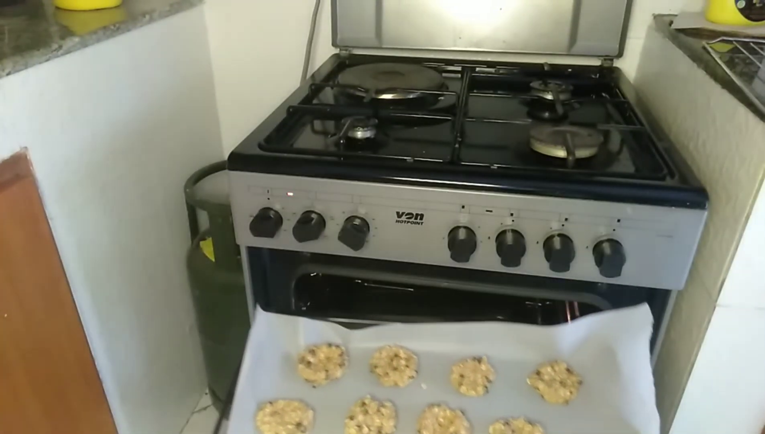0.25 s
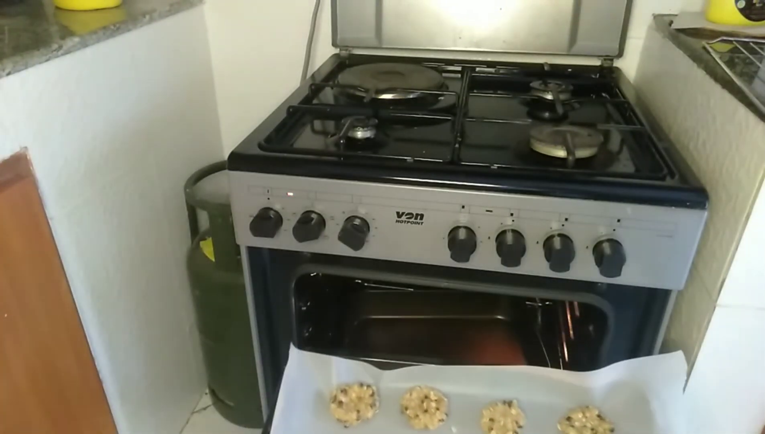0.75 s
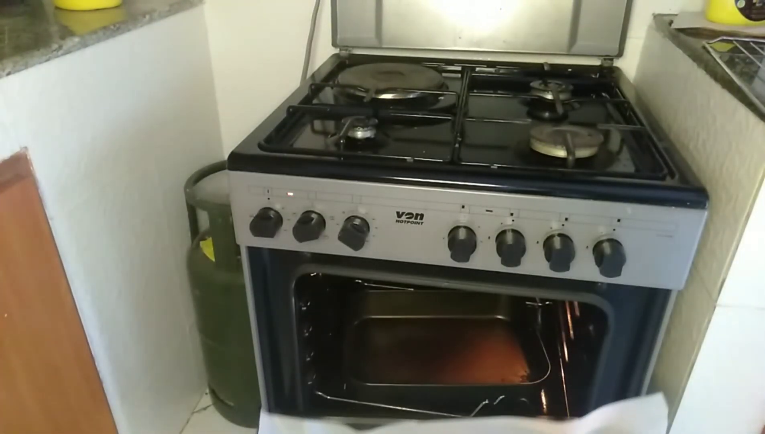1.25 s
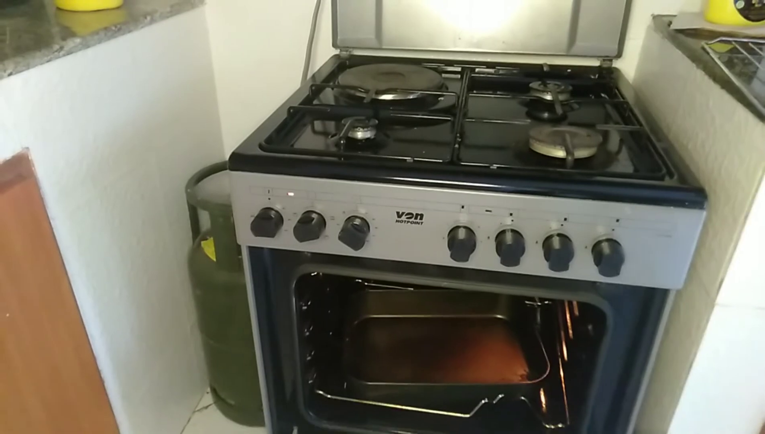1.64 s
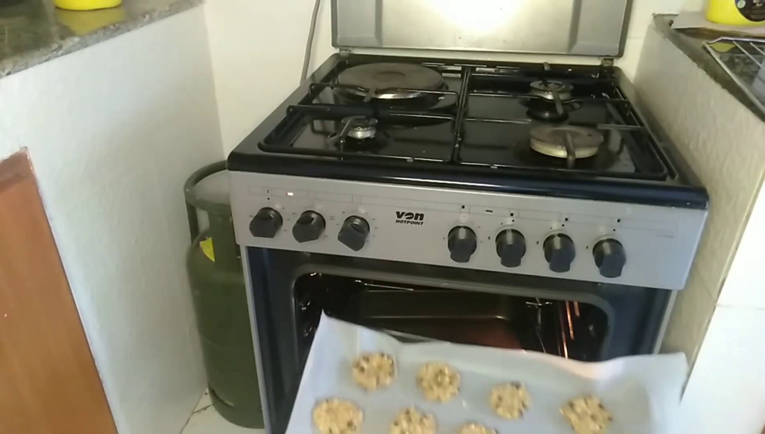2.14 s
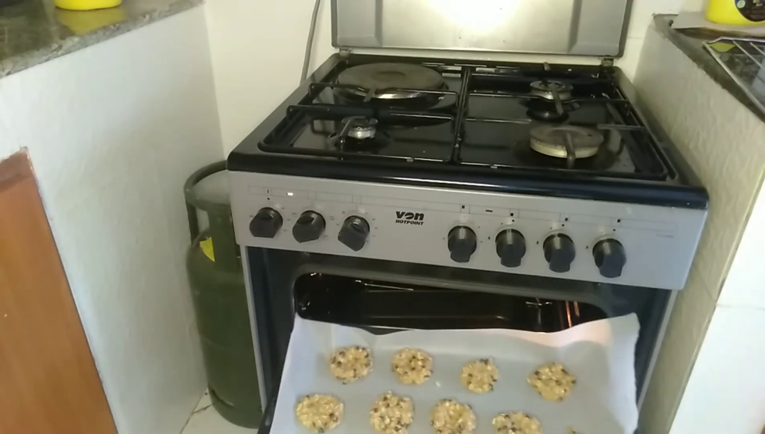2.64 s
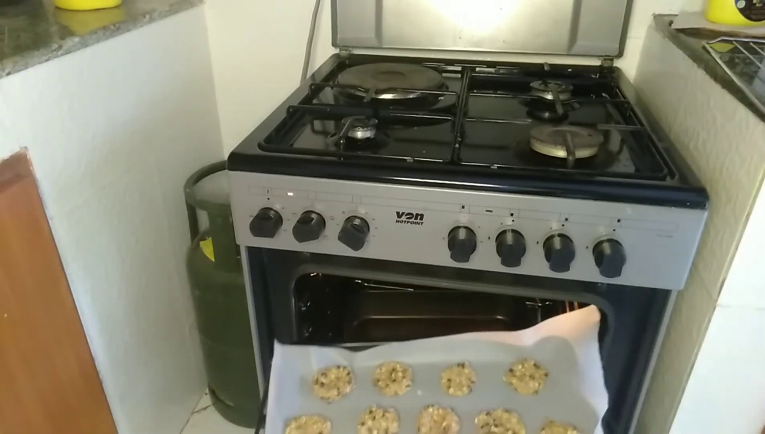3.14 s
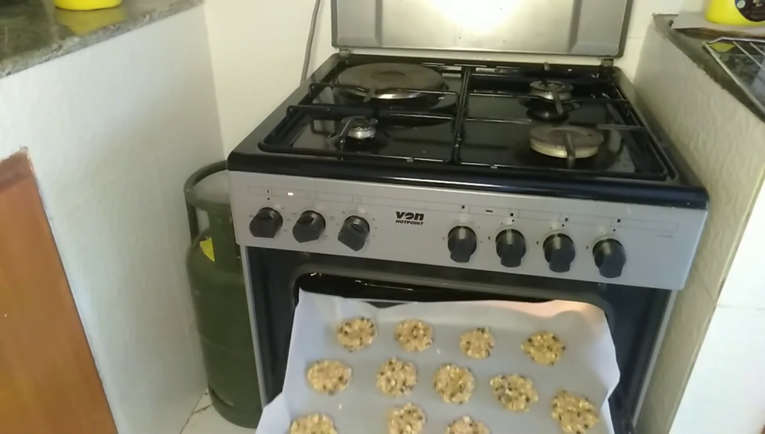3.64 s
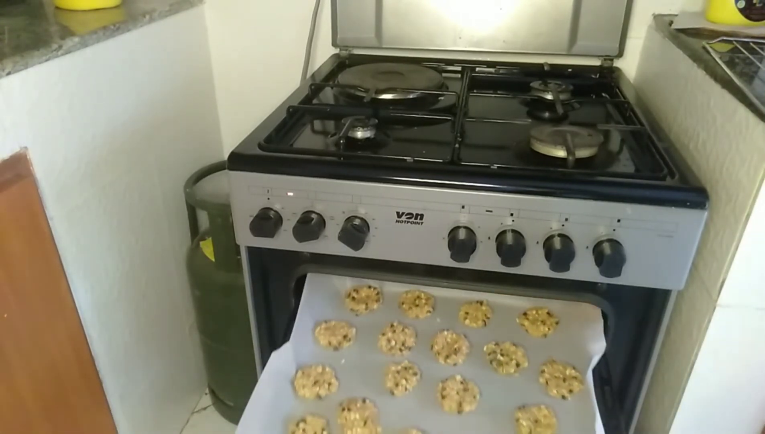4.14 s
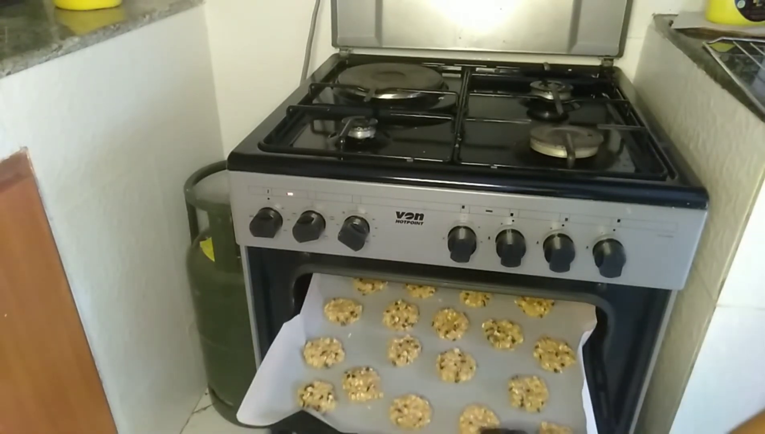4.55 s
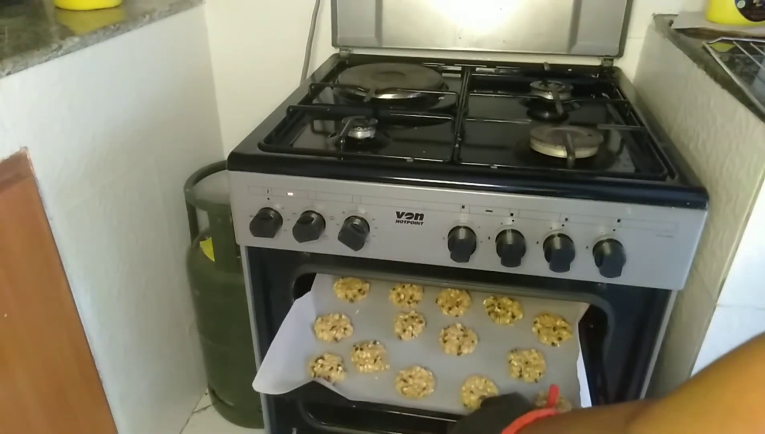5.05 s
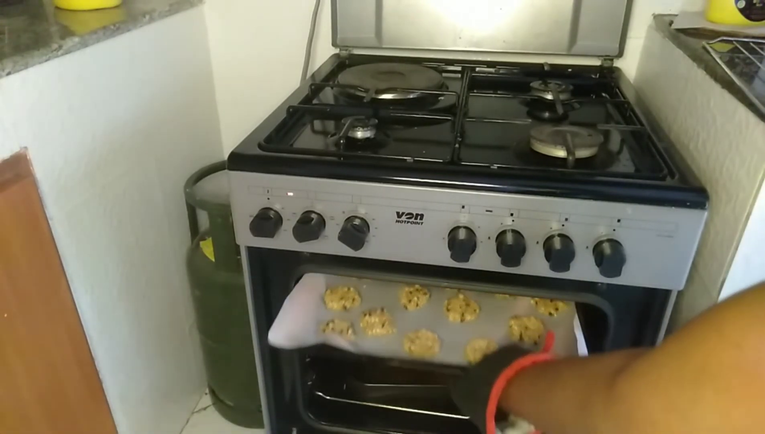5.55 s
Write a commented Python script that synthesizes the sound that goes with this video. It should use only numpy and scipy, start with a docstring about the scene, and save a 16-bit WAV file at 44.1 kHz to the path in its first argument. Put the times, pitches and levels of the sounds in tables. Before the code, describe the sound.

An oven door clanks open and bounces, then a metal baking tray bangs down, scrapes inward over rails and booms against the oven back.

```python
"""A small hard-walled kitchen, one microphone: an oven door drops onto its hinge stops and bounces,
a sheet-metal baking tray clanks down on it, bumps and scrapes in along the rails and strikes the back.
Each blow is a low thump plus decaying steel modes over a clatter of noise; scrape and paper are swelling
coloured noise. Far off outside, an engine hums as a few harmonics and small birds chirp as falling
tones. A faint tone fades away in the steady noise of the room."""
import sys
import numpy as np
from scipy import signal
from scipy.fft import rfft, irfft, next_fast_len
from scipy.io import wavfile
from scipy.ndimage import map_coordinates

SR = 44100
rng = np.random.default_rng(int(sys.argv[2]) if len(sys.argv) > 2 else 0)


def pcm_store(signal):
    """Save signal as 16-bit PCM."""
    levels = np.round(np.clip(np.atleast_2d(signal), -1, 1) * 32767)
    wavfile.write(sys.argv[1], SR, levels.astype(np.int16).T)


N = 255339  # samples in the scene


def amp(db):
    """Decibels to gain."""
    return 10 ** (np.asarray(db) / 20)


def rms(x):
    """Root mean square."""
    return np.sqrt(np.mean(x ** 2) + 1e-24)


def along(points, hz):
    """Read (f/Hz, value) points on a log frequency axis."""
    f, value = np.transpose(points)
    return np.interp(np.log(hz + 1), np.log(f + 1), value)


def curves(rows):
    """One value per sample for each column after t/s."""
    s, *columns = np.transpose(rows)
    return [np.interp(np.arange(N) / SR, s, column) for column in columns]


def wobble(rate, size=N):
    """A smooth random curve with rate knots a second."""
    knots = rng.standard_normal(int(size * rate / SR) + 4)
    # spline between the knots in tenths, then straight lines between the tenths
    smooth = map_coordinates(knots, [np.arange(10 * len(knots) - 10) / 10])
    return np.interp(np.arange(size) * 10 * rate / SR, np.arange(len(smooth)), smooth)


def filtered(x, response):
    """Shape the spectrum of x by a response of frequency."""
    padded = next_fast_len(len(x) + SR // 4)
    hz = np.fft.rfftfreq(padded, 1 / SR)
    return irfft(rfft(x, padded) * response(hz), padded)[:len(x)]


def noise(spectrum, size=N):
    """Noise coloured by (f/Hz, level/dB) points, brought to rms 1."""
    x = filtered(rng.standard_normal(size), lambda hz: amp(along(spectrum, hz)))
    return x / rms(x)


def add(track, s, x):
    """Mix x into the track at s seconds."""
    start = max(round(s * SR), 0)
    part = track[start:start + len(x)]
    part += x[:len(part)]


def arches(rows, fullness):
    """Gain of swells that rise from rest and sink back; a small fullness exponent flattens their tops."""
    t = np.arange(N) / SR
    power = np.zeros(N)
    for s, length, db in rows:
        progress = np.clip((t - s) / length, 0, 1)
        power += (amp(db) * np.abs(np.sin(np.pi * progress)) ** fullness) ** 2
    return np.sqrt(power)


# the kitchen's background colour: f/Hz, level/dB per Hz
ROOM_COLOUR = [(12, -40), (20, 1.5), (49, 1), (70, -8), (96, -13.5), (138, -8.5), (301, -18.5),
               (624, -13.5), (849, -16.5), (1000, -16), (2670, -30.5), (7110, -33), (9670, -35.5),
               (14700, -34), (16000, -32)]


def room():
    """The kitchen's quiet, nearly steady background noise."""
    drift_db = 0.6 * wobble(3)
    return amp(-61.5 + drift_db) * noise(ROOM_COLOUR)


def whine():
    """A faint background tone, fuzzy in level and phase, that fades away."""
    tone_hz, start_db, fade_db_per_s = 620, -70.5, 3.5
    t = np.arange(N) / SR
    tone = amp(2 * wobble(12)) * np.sin(2 * np.pi * tone_hz * t + 1.2 * wobble(25))
    return amp(start_db - fade_db_per_s * t) * np.sqrt(2) * tone


# the far engine slowly gathers speed: t/s, firing f/Hz
ENGINE_SPEED = [(.5, 122), (1.2, 126.4), (2.0, 130), (3.2, 130.8)]
# its note comes and goes in swells: start t/s, length t/s, peak level/dB
ENGINE_SWELLS = [(-.1, .5, -67), (.27, .68, -56.5), (.85, .89, -51.5), (1.72, .83, -54), (2.71, .24, -63.5),
                 (3.06, .36, -63)]
# its rumble: t/s, level/dB
RUMBLE_LEVEL = [(0, -69.5), (.4, -60.5), (3, -64), (4, -64), (5.7, -63)]


def engine():
    """A far engine: a swelling firing note, weak overtones and an unsteady rumble about an octave below."""
    firing_hz, = curves(ENGINE_SPEED)
    rumble_db, = curves(RUMBLE_LEVEL)
    phase = 2 * np.pi * np.cumsum(firing_hz) / SR
    firing = np.sin(phase) + amp(-21) * np.sin(2 * phase) + amp(-27) * np.sin(3 * phase)
    note = arches(ENGINE_SWELLS, fullness=0.8) * np.sqrt(2) * firing
    rumble = noise([(35, -44), (50, 1), (57, 1.0), (64, -19), (85, -35), (300, -120)])
    return note + amp(rumble_db) * rumble


# how long sound rings on: f/Hz, time to fall 60 dB t/s (for modes, before the body's sustain factor)
RING_ON = [(80, 1), (200, 1), (380, 0.74), (600, 0.81), (1000, 0.6), (2500, 0.49), (6000, 0.47),
           (15000, 0.42)]


def dying(x):
    """Each frequency of x dies away at its own speed."""
    hz, t, z = signal.stft(x, SR, nperseg=256)
    fade = amp(-60 * t / along(RING_ON, hz)[:, None])
    return signal.istft(z * fade, SR, nperseg=256)[1][:len(x)]


# the chirps: start t/s, length t/s, middle f/Hz, relative level/dB
CHIRPS = [(0.0, 0.12, 4820, -76.5), (0.085, .12, 3810, -77.5), (0.2, .17, 7470, -73.5),
          (0.27, 0.14, 3800, -75.5), (1.308, 0.14, 4650, -73), (1.88, 0.056, 5190, -77),
          (1.945, 0.054, 3370, -77), (2.109, 0.047, 5420, -69), (2.141, 0.15, 4830, -74),
          (2.3, .11, 3830, -78), (2.586, 0.03, 6320, -77), (2.67, .03, 4800, -77), (4.496, 0.13, 4850, -73)]


def birds():
    """Small birds outside: gliding tones with a buzzing pitch, blurred by the walls."""
    fall_octaves = 0.14
    song = np.zeros(N)
    for s, length, pitch_hz, db in CHIRPS:
        count = int(length * SR)
        buzz = 0.085 * wobble(500, size=count)
        glide = 2 ** (fall_octaves * np.linspace(0.5, -0.5, count))
        hz = pitch_hz * glide * (1 + buzz)
        tone = np.sin(2 * np.pi * np.cumsum(hz) / SR)
        add(song, s, amp(db) * 2 * np.hanning(count) * tone)
    echo = dying(rng.standard_normal(SR // 2))
    return signal.fftconvolve(song, echo / np.linalg.norm(echo))[:N]


# the baking paper's colour: f/Hz, level/dB per Hz
PAPER_COLOUR = [(2000, -10.5), (3200, -6.5), (5000, -12.5), (7000, -1), (9500, -13.5), (12000, -13.5),
                (15000, -4.5), (16000, 0)]
# single creases snap as the tray is carried: t/s, level at the onset/dB
CREASES = [(0.018, -62.5), (1.895, -67), (2.37, -65), (2.6, -72)]


def creases():
    """Faint snaps of the paper: bursts of its noise, dying away in the room."""
    t60_s = 0.33
    track, t = np.zeros(N), np.arange(SR // 4) / SR
    for s, db in CREASES:
        add(track, s, amp(db - 60 * t / t60_s) * noise(PAPER_COLOUR, size=len(t)))
    return track


def ringing(modes, t, sustain, waver):
    """Decaying modes at fresh strengths; loose contact makes their phase waver."""
    hz, db = np.transpose(modes)[:, :, None]
    drift = wobble(30, size=len(modes) * len(t)).reshape(len(modes), -1)
    phase = 2 * np.pi * (hz * t + rng.random(hz.shape)) + waver * drift
    fade_db = 60 * t / (sustain * along(RING_ON, hz))
    strength_db = db + rng.normal(0, 0.98, hz.shape)
    return np.sum(amp(strength_db - fade_db) * np.sin(phase), axis=0)


# edges of the thump, knock, clang, clink and tick bands: f/Hz
BAND_EDGES = [60, 220, 700, 2500, 9000, 16000]


def struck(blows, modes, colour, balance_db, modes_db, sustain, direct_db, direct_s,
           crack_db, chatter_db, waver):
    """Blows on a steel body: a low thump, and clear modes over a dense clatter with its own brightness."""
    pivot_hz = 1340  # brightness tilts the upper bands about this frequency
    track, t = np.zeros(N), np.arange(SR * 3 // 4) / SR
    head = slice(SR // 25)  # levels hold over the first 40 ms
    below = lambda hz, edge: 1 / (1 + (hz / edge) ** 10)
    centres_hz = np.sqrt(np.multiply(BAND_EDGES[1:-1], BAND_EDGES[2:]))
    octaves = np.log2(centres_hz / pivot_hz)
    for s, contact, thump_db, clang_db, brightness in blows:
        upper_db = clang_db + np.array(balance_db) + brightness * octaves
        levels_db = [thump_db, *upper_db]
        # loose parts chatter just after the blow, then melt into the room's answer
        chatter = amp(chatter_db * wobble(725, size=len(t)) * np.exp(-t / 0.013))
        clatter = chatter * dying(noise(colour, size=len(t)))
        ring = ringing(modes, t, sustain, waver)
        body = clatter / rms(clatter[head]) + amp(modes_db) * ring / rms(ring[head])
        # a longer contact rises more slowly
        onset = 1 - np.exp(-(2 * t / contact) ** 2)
        # the direct sound stands above the room for the first moments
        shape = onset * (1 + amp(direct_db) * np.exp(-t / direct_s))
        for lo, hi, db in zip(BAND_EDGES, BAND_EDGES[1:], levels_db):
            # an early crack, stronger in the treble, which leaves the steel first
            crack = 1 + amp(crack_db) * np.sqrt(lo / BAND_EDGES[-1]) * np.exp(-t / 0.0068)
            band = filtered(body, lambda hz: below(hz, hi) - below(hz, lo))
            part = crack * shape * band
            add(track, s, amp(db) * part / rms(part[head]))
    return track


# the door's blows: t/s, contact t/s, thump level/dB, clang level/dB before balance and brightness,
# brightness/dB per octave
DOOR_BLOWS = [(.488, .0018, -72, -74, 0.5), (.683, 0.0015, -57, -53, -2), (.7505, 0.0014, -43.5, -35, 0.5),
              (.881, .0009, -53.5, -48.5, -1.5), (.905, 0.0011, -50, -40, -0.65),
              (.946, 0.0044, -54, -53, -1.5), (1.04, .0017, -65, -64.5, 2), (1.149, 0.0014, -71, -59, -2.5),
              (1.26, 0.0047, -63, -71, -1.5), (1.3, 0.044, -77, -66, -1.5),
              (1.485, 0.017, -75, -64.5, -1.5)]
# the door's strongest modes: f/Hz, mean relative level/dB
DOOR_MODES = [(347, -8), (378, -1), (399, 0), (596, -9), (625, -8), (987, -11), (1005, -12), (1456, -12),
              (1617, -12), (1733, -15), (2027, -16), (2412, -16), (3209, -17), (3262, -14), (3306, -18),
              (4480, -21), (6696, -17), (6815, -20), (6940, -18), (6968, -20), (7014, -21), (7036, -20),
              (7127, -20), (7317, -21), (7368, -22), (7474, -22)]
# the crowd of its weaker modes: f/Hz, level/dB per Hz
DOOR_COLOUR = [(35, -36), (60, -0.5), (87, -19.5), (212, -6.5), (274, -14), (389, -6), (480, -14),
               (607, -11), (842, -14.5), (968, -10), (3500, -22), (4860, -30.5), (7060, -24), (9350, -33.5),
               (16000, -24)]
# its share of a blow in the knock, clang, clink and tick bands: level/dB each
DOOR_BALANCE_DB = [0.5, -1, -4, -15.5]


def door():
    """The oven door lands on its hinge stops, bounces and settles."""
    return struck(DOOR_BLOWS, DOOR_MODES, DOOR_COLOUR, DOOR_BALANCE_DB, modes_db=-2, sustain=0.49,
                  direct_db=3.5, direct_s=0.073, crack_db=4, chatter_db=1.5, waver=0.36)


# pushes sliding the tray over the door, then along the rails: start t/s, length t/s, relative level/dB
PUSHES = [(3.45, 0.63, -71), (4.27, 0.28, -58.5), (4.8, 0.97, -73), (5.33, 0.63, -59)]
# the scraping steel's colour: f/Hz, level/dB per Hz
SCRAPE_COLOUR = [(88, -42), (150, -3), (473, -3.5), (515, -2.5), (1280, 0), (1520, -7), (2490, -11.5),
                 (4770, -24), (7080, -29), (9000, -45), (11700, -58), (19800, -120)]
# the paper drags as the tray moves: start t/s, length t/s, relative level/dB
RUSTLES = [(2.65, 0.33, -72), (3.3, 0.51, -63.5), (3.72, 0.44, -61), (4.17, 0.52, -67.5), (4.7, 1, -64.5),
           (5.3, 1, -60.5)]


def sliding():
    """As the tray moves its paper hisses, and with each push steel scrapes grainily and the sheet sings."""
    grit = amp(0.82 * wobble(300)) * noise(SCRAPE_COLOUR)
    # the grit sings in the many close modes of the thin sheet
    t = np.arange(SR // 4) / SR
    sheet = rng.standard_normal(len(t)) * amp(-60 * t / 0.22)
    singing = signal.fftconvolve(grit, sheet / np.linalg.norm(sheet))[:N]
    scrape = arches(PUSHES, fullness=0.59) * amp(0.96 * wobble(35)) * (grit + singing)
    rustle = amp(1.38 * wobble(22) + 1.3 * wobble(700)) * noise(PAPER_COLOUR)
    return scrape + arches(RUSTLES, fullness=0.37) * rustle


# the tray on the open door: t/s, contact t/s, thump level/dB, clang level/dB before balance and
# brightness, brightness/dB per octave
TRAY_BLOWS = [(2.845, .0022, -80, -74.5, 3.5), (2.95, .0009, -80, -65.5, 1.2), (3.204, .003, -87, -71, 2.5),
              (3.217, 0.00092, -80, -60, 4), (3.274, 0.00061, -79, -71.5, 5.5),
              (3.3135, 0.0022, -42.5, -32.5, -4), (3.667, 0.0027, -61.5, -74, 3)]
# the tray's strongest modes: f/Hz, mean relative level/dB
TRAY_MODES = [(184, -8), (293, -4), (312, -2), (347, -1), (382, 0), (404, -5), (533, -9), (560, -6),
              (633, -11), (777, -11), (868, -9), (884, -11), (914, -8), (958, -11), (1139, -10),
              (1188, -12), (1315, -14), (1444, -12), (1721, -14), (1743, -15), (1768, -10), (1797, -14),
              (2574, -22), (6777, -26), (6897, -24), (6922, -25), (6992, -26), (7062, -25), (7167, -26),
              (7490, -22)]
# the crowd of its weaker modes: f/Hz, level/dB per Hz
TRAY_COLOUR = [(35, -45), (70, -5.5), (110, -16), (230, -7.5), (350, -6), (480, -6.5), (570, -9),
               (710, -14), (920, -13), (1750, -18), (2000, -19.5), (4600, -35.5), (7300, -29), (9800, -39),
               (15500, -25.5)]
# its share of a blow in the knock, clang, clink and tick bands: level/dB each
TRAY_BALANCE_DB = [-3, 0.5, -1, -10]


def tray():
    """The sheet-metal tray touches, then drops on the open door."""
    return struck(TRAY_BLOWS, TRAY_MODES, TRAY_COLOUR, TRAY_BALANCE_DB, modes_db=1.5, sustain=0.76,
                  direct_db=-1.0, direct_s=0.025, crack_db=2, chatter_db=2.0, waver=0.28)


# the tray on the rails: t/s, contact t/s, thump level/dB, clang level/dB before balance and
# brightness, brightness/dB per octave
RAIL_BLOWS = [(4.204, 0.0051, -47, -53.5, -2.2), (4.257, .0024, -44.5, -48, 2.8),
              (4.288, 0.0021, -52, -56, -5), (4.338, 0.0047, -63, -56, -3), (4.4, 0.0086, -63, -59, -2.5),
              (4.718, 0.0067, -65.5, -60, 0), (4.845, 0.01, -69, -56, 0),
              (4.885, 0.0027, -54.5, -56.5, -0.5), (5.124, 0.0018, -56, -64, -2.5),
              (5.168, 0.017, -70, -64, 2.5), (5.25, .0022, -72, -64.5, -1), (5.335, 0.0045, -58, -56, -.6),
              (5.411, 0.0043, -65.5, -63, 2), (5.495, .0069, -68, -61, 2.5),
              (5.653, .0052, -56.5, -54.5, 3)]
# the oven box's strongest modes: f/Hz, mean relative level/dB
OVEN_MODES = [(127, 0), (151, -3), (186, -4), (238, -9), (297, -9), (419, -11), (529, -5), (559, -12),
              (591, -14), (649, -10), (825, -15), (1060, -13), (2176, -19), (2319, -20), (6570, -26),
              (6728, -25), (6753, -24), (6784, -24), (6925, -26), (7175, -26)]
# the crowd of its weaker modes: f/Hz, level/dB per Hz
OVEN_COLOUR = [(35, -39), (60, -10), (118, 1), (301, -16.5), (354, -15.5), (540, -18.5), (732, -16),
               (1060, -13), (1440, -15.5), (2250, -19.5), (4860, -36.5), (6740, -31.5), (9130, -37.5),
               (14900, -29), (16000, -43)]
# its share of a blow in the knock, clang, clink and tick bands: level/dB each
RAIL_BALANCE_DB = [-1, -0.5, -7, -31]


def rails():
    """The tray bumps along the rails and booms the oven box."""
    return struck(RAIL_BLOWS, OVEN_MODES, OVEN_COLOUR, RAIL_BALANCE_DB, modes_db=1.5, sustain=0.78,
                  direct_db=-6.5, direct_s=0.046, crack_db=12.5, chatter_db=2.0, waver=0.22)


# the tray's far edge on the back panel: t/s, contact t/s, thump level/dB, clang level/dB before
# balance and brightness, brightness/dB per octave
BACK_BLOWS = [(5.739, 0.0059, -44, -47, 1), (5.746, .0035, -33.5, -41, -0.5)]
# the back panel's strongest modes: f/Hz, mean relative level/dB
BACK_MODES = [(84, -13), (124, 0), (156, -4), (184, -7), (340, -11), (415, -8), (520, -13), (1119, -11),
              (1250, -16), (2580, -18), (3130, -15), (3334, -12), (3433, -13), (3530, -13), (4600, -18),
              (6683, -16), (7006, -13), (7237, -13), (8001, -17)]
# the crowd of its weaker modes: f/Hz, level/dB per Hz
BACK_COLOUR = [(35, -39), (60, -19), (124, 0), (238, -18), (427, -7), (593, -21.5), (968, -16), (1140, -11),
               (1470, -22), (3340, -17.5), (5210, -27.5), (7230, -20), (8920, -33), (14900, -34),
               (16000, -20)]
# its share of a blow in the knock, clang, clink and tick bands: level/dB each
BACK_BALANCE_DB = [-0.5, 1, 6, -2]


def back_wall():
    """The tray stops against the back panel with a boom and a bright clash."""
    return struck(BACK_BLOWS, BACK_MODES, BACK_COLOUR, BACK_BALANCE_DB, modes_db=-0.5, sustain=0.42,
                  direct_db=-13, direct_s=0.022, crack_db=9, chatter_db=2.0, waver=0.69)


def scene():
    """All sources, near and far, at one microphone."""
    background = room() + whine() + engine() + birds()
    kitchen = creases() + door() + sliding() + tray() + rails() + back_wall()
    return (background + kitchen)[None]


def record(dry):
    """The recorder keeps nothing above its band limit."""
    top_hz = 15750
    return np.array([filtered(x, lambda hz: hz < top_hz) for x in dry])


dry = scene()
out = record(dry)
pcm_store(out)
```